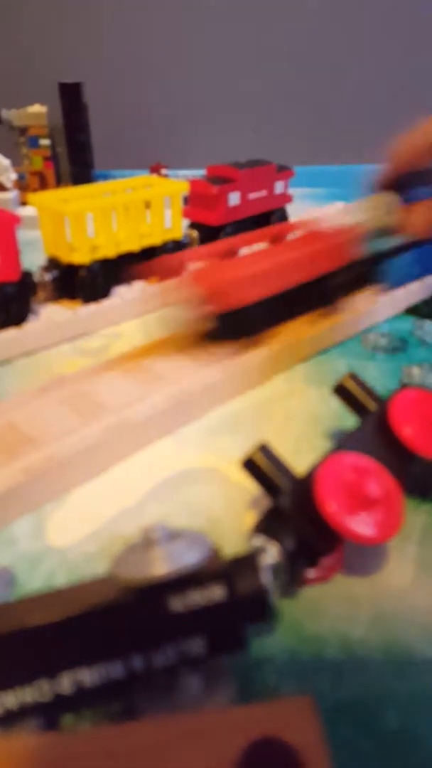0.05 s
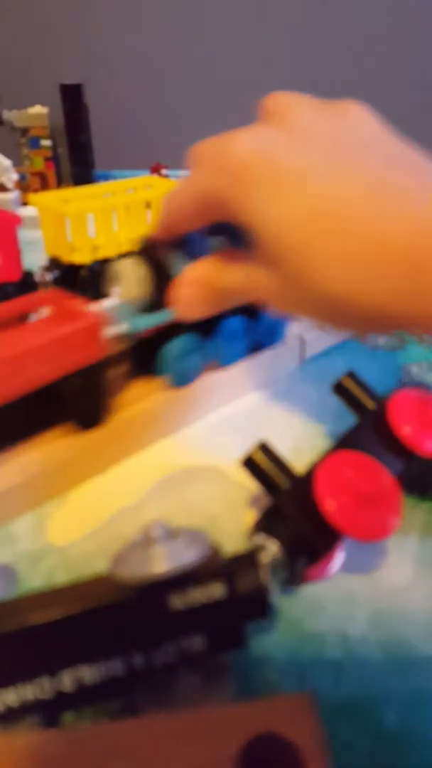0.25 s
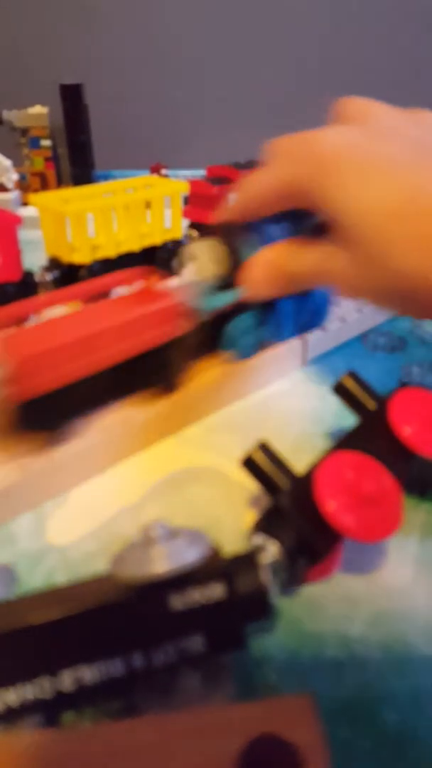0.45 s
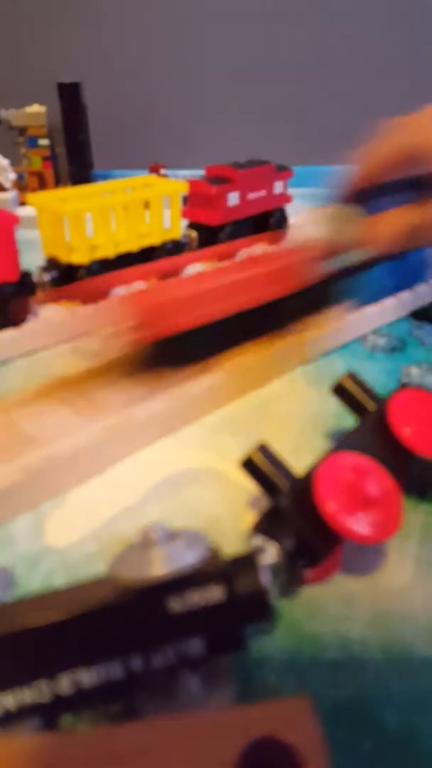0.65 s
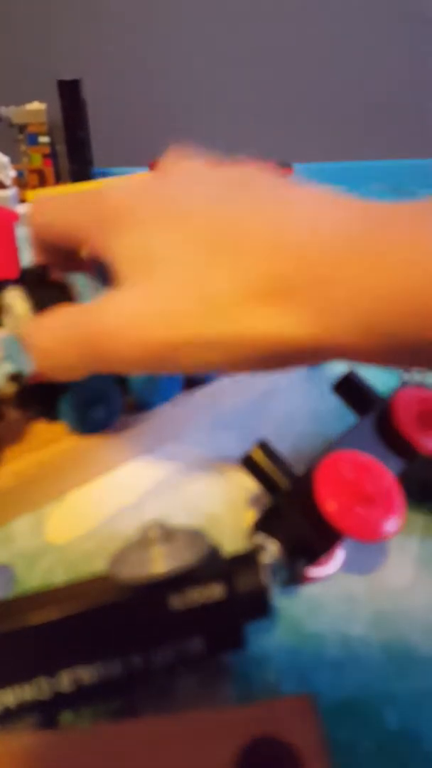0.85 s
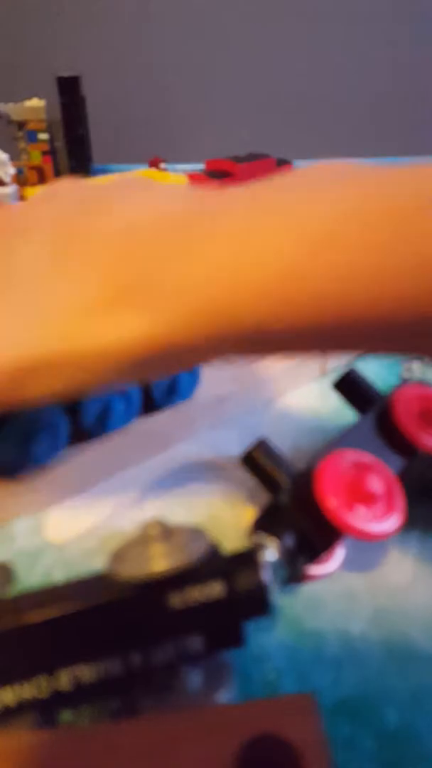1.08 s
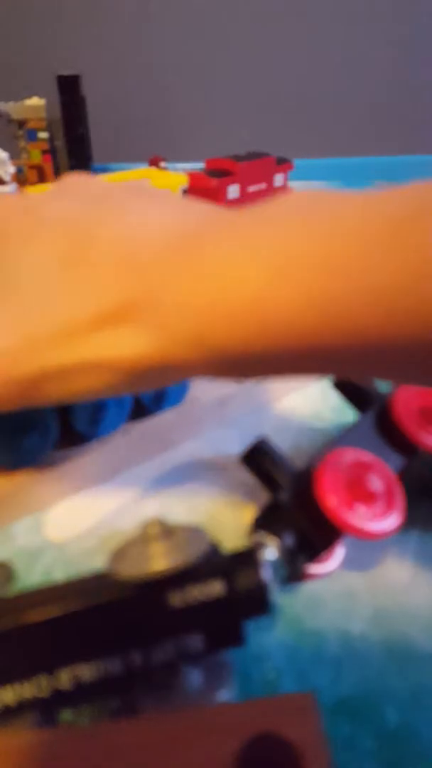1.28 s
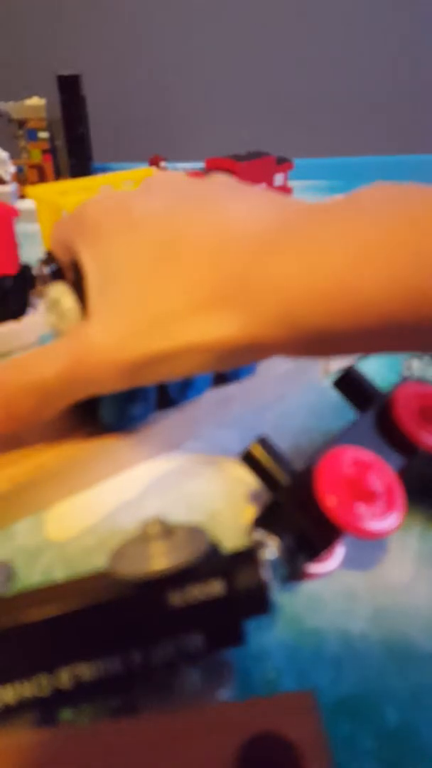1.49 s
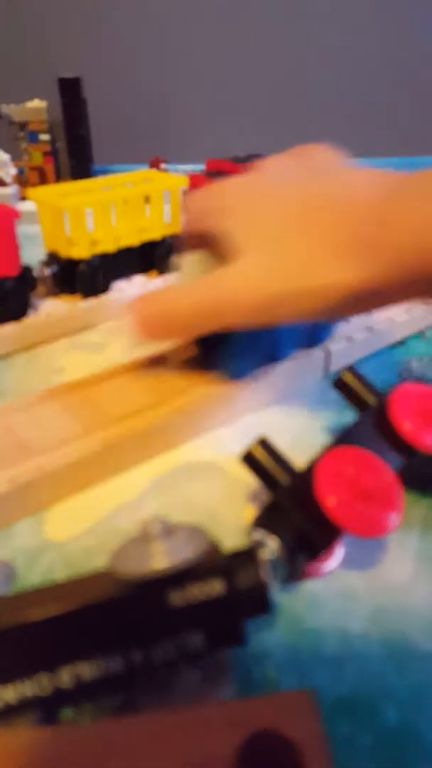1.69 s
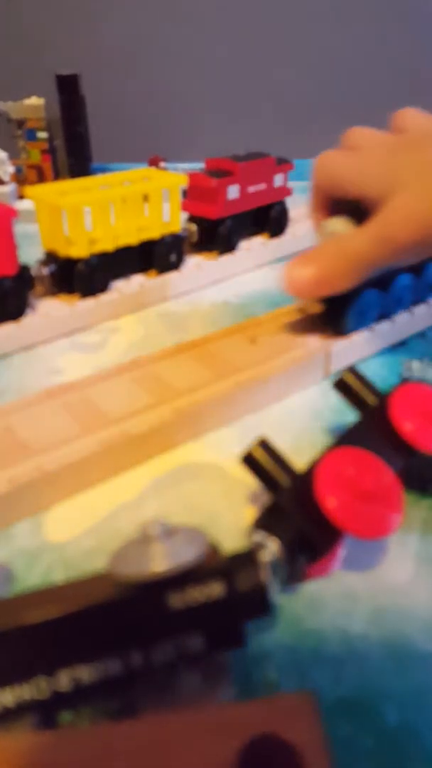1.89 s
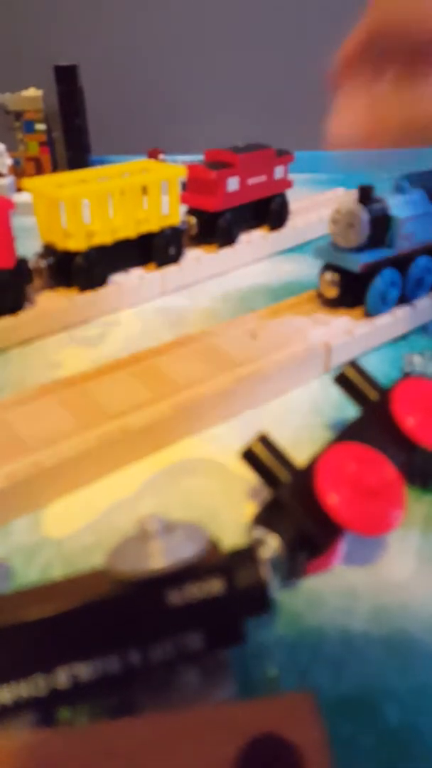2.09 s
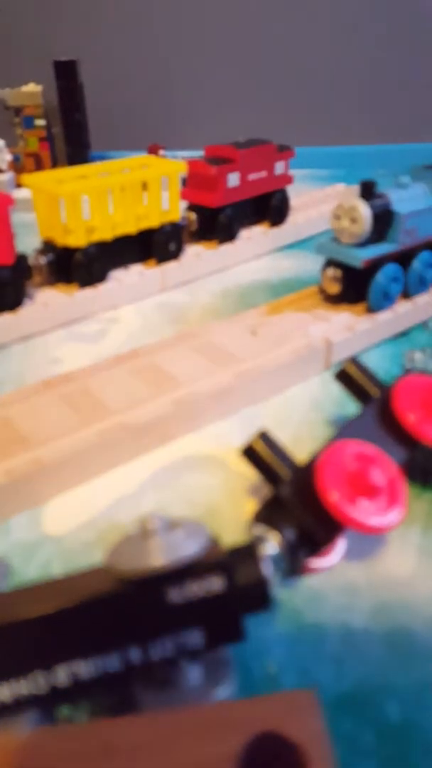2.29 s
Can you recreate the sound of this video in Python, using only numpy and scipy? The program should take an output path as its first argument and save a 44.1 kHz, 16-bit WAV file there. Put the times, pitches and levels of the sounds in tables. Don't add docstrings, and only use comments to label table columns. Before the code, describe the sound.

Wooden toy train pushed back and forth on hollow wooden track, rumbling, rattling and clacking close up

```python
import sys
import numpy as np
from scipy import signal
from scipy.fft import rfft, irfft, next_fast_len
from scipy.io import wavfile
from scipy.ndimage import uniform_filter1d

SR = 44100
rng = np.random.default_rng(int(sys.argv[2]) if len(sys.argv) > 2 else 0)


def file_out(sig):
    cols = np.atleast_2d(sig).T
    lim = np.clip(cols, -1, 1)
    pcm = np.round(lim * 32767).astype(np.int16)
    wavfile.write(sys.argv[1], SR, pcm)


def how_loud(loudness_db):
    steps = np.asarray(loudness_db, float) / 20
    return 10 ** steps


N = 103194


def evened(x):
    return x / np.sqrt(np.mean(x ** 2) + 1e-20)


def read(points, hz):
    f, value = np.transpose(points)
    return np.interp(np.log(hz + 1), np.log(f + 1), value)


def along(rows, axis=1):
    rows = np.asarray(rows)
    return np.interp(np.arange(N) / SR, rows[:, 0], rows[:, axis])


def colour(x, points):
    gain = np.log(how_loud(read(points, abs(np.fft.fftfreq(4096, 1 / SR)))))
    response = np.fft.ifft(np.exp(np.conj(signal.hilbert(gain)))).real[:2048]
    return signal.oaconvolve(x, response / np.linalg.norm(response))[:N]


def body(x, modes, damping=1):
    t = np.arange(4096) / SR
    response = np.zeros(4096)
    for hz, width_hz, db in modes:
        decay = np.exp(-np.pi * width_hz * damping * t)
        response += how_loud(db) * np.sqrt(width_hz) * decay * np.sin(2 * np.pi * hz * t)
    return signal.oaconvolve(x, response / np.linalg.norm(response))[:N]


def resonate(x, hz, width_hz):
    turn = np.exp(2j * np.pi * np.cumsum(hz) / SR)
    r = np.exp(-np.pi * width_hz / SR)
    return (turn * signal.lfilter([1], np.convolve([1, -r], [1, -r]), x / turn)).real


def grains(per_s, spread_db, smooth):
    draw = rng.random((N, 2))
    size = how_loud(spread_db * np.minimum(-np.log(draw[:, 1] + 1e-9), 3))
    bumps = size * (draw[:, 0] < per_s / SR) * rng.choice([-1., 1.], N)
    return evened(evened(bumps) + smooth * rng.standard_normal(N))


def steadied(x):
    n = int(0.052 * SR)
    power = uniform_filter1d(uniform_filter1d(x ** 2, n), n)
    return evened(x / (abs(power) + 1e-3) ** (0.94 / 2))


def knocks(rows, decay_s, db):
    out, t = np.zeros(N + 1500), np.arange(1500) / SR
    envelope = np.minimum(t / 0.00035, 1) * np.exp(-t / decay_s)
    for s, level_db, hz in rows:
        at = round(s * SR)
        out[at:at + 1500] += how_loud(level_db + db) * envelope * np.sin(2 * np.pi * hz * t)
    return out[:N]


def pair(x, lag_s, left_db, scatter_db=-60):
    size, t = next_fast_len(N + 64), np.arange(300) / SR
    delay = np.exp(-2j * np.pi * np.fft.rfftfreq(size, 1 / SR) * lag_s)
    late = irfft(rfft(x, size) * delay, size)[:N]
    echo = rng.standard_normal((2, 300))
    echo = (echo - uniform_filter1d(echo, size=41)) * np.exp(-t / 0.0025)
    echo = how_loud(scatter_db) * echo / np.linalg.norm(echo, axis=1, keepdims=True)
    echo = echo + (t == 0)
    both = np.array([x * how_loud(left_db / 2), late * how_loud(-left_db / 2)])
    return signal.oaconvolve(both, echo, axes=1)[:, :N]


def spread(x):
    hz, t, z = signal.stft(x, SR, nperseg=64)
    phase = np.exp(2j * np.pi * rng.random((2, *z.shape)))
    return signal.istft(z * phase, SR, nperseg=64)[1][:, :N]


# frequency in Hz, density in dB per Hz.
HUSH = [(18, -28), (30, -3.5), (110, 2), (844, -10.5), (1500, -18.5), (16000, -39.5)]


def hush():
    noise = rng.standard_normal((3, N))
    return how_loud(-68) * np.array([colour(noise[0] + 2.9 * own, HUSH) for own in noise[1:]])


# time in seconds, hand pressure in dB, wheel looseness in dB.
PUSHES = [
    [(0, -18.5, -4.5), (.078, -33, -6.5), (.14, -17, -7.5), (.225, -18.5, -6), (.262, -32, -8),
     (.385, -37.5, -10), (.455, -66, -11.5)],
    [(.484, -51, -22.5), (.526, -23.5, -9.5), (.625, -27.5, -7.5), (.67, -43, -10)],
    [(.7, -24.5, -10.5), (.748, -26, -4), (.782, -18.5, -6), (.83, -33.5, -5), (.89, -33.5, -14),
     (.945, -62, -3), (1.0, -51, -4.5), (1.045, -56, -19)],
    [(1.09, -38, -51), (1.144, -46, -3.5), (1.165, -35.5, -10), (1.185, -44.5, -8), (1.25, -39, -6.5),
     (1.345, -70.5, -3.5)],
    [(1.375, -66, -18), (1.398, -20, -15.5), (1.424, -43.5, 0.5), (1.446, -25.5, -8.5), (1.49, -33, -9),
     (1.585, -49, -12.5)],
    [(1.625, -30, -24), (1.7, -20.5, -14.5), (1.82, -21, -14.5), (1.875, -33.5, -6), (1.995, -43.5, -1.5)],
    [(2.035, -21.5, -14.5), (2.1, -48.5, -4.5), (2.15, -43.5, -20), (2.25, -75.5, -6.5)],
]


def pushes():
    rows = np.concatenate(PUSHES)
    return along(rows, axis=1), along(rows, axis=2) + 10


# frequency in Hz, width in Hz, level in dB.
TABLE = [(107, 45, -3), (157, 75, -19), (203.6, 3.7, -9), (273.5, 10, -0.5), (342.7, 36, -1),
         (407.4, 37, 4)]
# time in seconds, frequency in Hz, dB over the drumming.
HOLLOW = [(0, 358.5, -7.5), (1.58, 367, -10.5), (1.66, 257.6, -13.5), (1.83, 244, -11.5), (1.88, 147.5, 7),
          (1.93, 183.7, 5.5), (1.98, 168.6, 7.5), (2.03, 138, -12), (2.12, 178, 2), (2.21, 250, 0.5)]


def drum(bumps, press):
    span = steadied(resonate(bumps, along(HOLLOW, axis=1), 63))
    span = how_loud(along(HOLLOW, axis=2)) * span
    return how_loud(press - 1.5) * (steadied(body(bumps, TABLE)) + span)


# frequency in Hz, width in Hz, level in dB.
RAILS = [(601, 52, 2), (743, 136, 2.5), (850, 150, -2), (980, 95, 3), (1235, 200, -4)]


def rattle(bumps, press, loose):
    shaken = body(bumps + grains(200, 1.3, 0.71), RAILS)
    return how_loud(press + 0.44 * loose - 5.0) * steadied(shaken)


# frequency in Hz, width in Hz, level in dB.
WHEELS = [(1650, 270, -6.5), (1848, 210, 4.5), (2290, 320, 9), (2600, 470, 13), (2890, 170, 9),
          (3060, 190, 5.5), (3330, 200, -1.5), (5080, 290, 0)]


def chatter(press, loose):
    parts = sum(how_loud(mode[2]) * body(grains(320, 4.3, 0.35), [mode]) for mode in WHEELS)
    band = signal.butter(2, [1500, 6500], "band", fs=SR, output="sos")
    return how_loud(press + loose - 13.5) * steadied(signal.sosfilt(band, parts))


# frequency in Hz, level in dB.
GRIT = [(1000, -42), (1800, -12), (3600, -7.5), (4200, -13.5), (8000, -26), (11000, -26), (15000, -34.5)]


def scrape(rubs, press, loose):
    return how_loud(press + 2.34 * loose - 20.0) * steadied(colour(rubs, GRIT))


# frequency in Hz, decay by 60 dB in seconds.
ROOM = [(150, 0.14), (2500, 0.21), (14000, 0.0089)]


def room(x):
    echoes = np.zeros((2, SR // 2))
    spots = np.arange(60, SR // 2 - 20, 20)
    shape = (2, len(spots))
    np.put_along_axis(echoes, spots + rng.integers(0, 20, shape), rng.choice([-1., 1.], shape), 1)
    hz, t, z = signal.stft(echoes, SR, nperseg=256)
    fade = how_loud(-60 * t / read(ROOM, hz)[:, None])
    tail = signal.istft(z * fade, SR, nperseg=256)[1]
    return signal.fftconvolve(x[None], tail / np.linalg.norm(tail[0]), axes=1)[:, :N]


# start in seconds, peak in dB, ring in Hz, snap in dB.
CLACKS = [(.0024, -13, 2750, -37.5), (.0315, -13, 1990, -35), (.095, -14, 3060, -41),
          (.138, -9.5, 3420, -15), (.1695, 3.5, 3250, -39), (.1932, -4.5, 3510, -34),
          (.2185, -10, 2290, -18.5), (.291, -27, 2370, -10), (.3465, -21, 1750, -19),
          (.5282, -11.5, 2290, -39), (.587, -15, 2580, -17.5), (.712, -15.5, 3040, -20),
          (.741, -3.5, 2450, -17), (.9585, -42, 2280, -17), (1.1135, -43.5, 2220, -13),
          (1.148, -24, 1730, -10.5), (1.1962, -24.5, 2630, -21), (1.2215, -29, 2600, -19),
          (1.231, -26, 2740, -13.5), (1.241, -26, 2890, -14.5), (1.4045, -26, 4030, 1),
          (1.606, -34, 3270, -21.5), (1.682, -15.5, 3220, -45), (1.779, -15.5, 1920, -33),
          (1.79, -9.5, 3070, -18.5), (1.8477, -14.5, 2460, -32.5), (2.049, -15.5, 2440, -40)]
# frequency in Hz, level in dB.
SNAP = [(1500, -3), (4000, 0.5), (7000, -11), (11000, -9), (15500, -9.5)]


def clacks():
    hits, snaps, rings = np.zeros((3, N))
    t = np.arange(600) / SR
    shake = rng.standard_normal((len(CLACKS), 600)) * t * np.exp(-t / 0.0009)
    shake = shake / np.linalg.norm(shake, axis=1, keepdims=True)
    envelope = np.minimum(t / 0.0017, 1) * np.exp(-t / 0.0014)
    for contact, (s, db, hz, snap_db) in zip(shake, CLACKS):
        at = round(s * SR)
        hits[at:at + 600] += how_loud(db) * contact
        snaps[at:at + 600] += how_loud(db + snap_db) * contact
        rings[at:at + 600] += how_loud(db + 3.0) * envelope * np.sin(2 * np.pi * hz * t)
    thud = how_loud(9) * body(hits, RAILS, damping=2.5)
    clack = how_loud(5.5) * body(hits, WHEELS, damping=0.67) + rings
    return thud, clack, how_loud(21.0) * colour(snaps, SNAP)


# start in seconds, level in dB, pitch in Hz.
JOLTS = [(0.102, -15, 715), (0.114, -10, 452), (0.127, -19, 704), (0.139, -4, 766), (0.152, -17.5, 452),
         (0.167, -17.5, 505), (0.169, -14, 816), (0.194, -10, 890), (0.207, -9.5, 700), (0.216, -16, 495),
         (0.507, -28, 452), (0.528, -13.5, 452), (0.559, -12.5, 936), (0.589, -13, 577), (0.698, -22, 573),
         (0.741, -29, 644), (0.765, -10.5, 729), (0.777, -8.5, 969), (0.786, -8.5, 750),
         (0.809, -14.5, 715), (1.16, -26, 460), (1.196, -21.5, 835), (1.223, -23, 960), (1.229, -30.5, 760),
         (1.245, -57, 597), (1.394, -22, 519), (1.44, -14.5, 628), (1.615, -26, 452), (1.627, -19, 462),
         (1.644, -20.5, 654), (1.656, -24.5, 616), (1.71, -21.5, 452), (1.733, -20.5, 730),
         (1.754, -14.5, 680), (1.777, -12, 886), (1.786, -9.5, 570), (1.819, -13, 670), (1.85, -17, 720),
         (2.017, -22.5, 800), (2.038, -28, 465)]


def jolts():
    return knocks(JOLTS, 0.0027, db=0.5)


# start in seconds, level in dB, pitch in Hz.
TICKS = [(0.1141, -17, 3360), (0.1703, -11, 3250), (0.1812, -14, 3410), (0.208, -24, 3370),
         (0.5453, -15, 3290), (0.5936, -16.5, 2920), (0.728, -19, 3150), (0.7403, -12.5, 3673),
         (0.7564, -30, 2930), (0.7714, -20.5, 3660), (0.7894, -17, 3360), (0.8094, -26, 2920),
         (0.835, -22, 3130), (1.1564, -32, 3180), (1.162, -35, 3150), (1.2284, -39, 2730),
         (1.254, -46, 2760), (1.391, -38, 3300), (1.4113, -41, 3040), (1.4496, -39, 3400),
         (1.4596, -38, 3070), (1.618, -38, 3000), (1.6765, -21, 3160), (1.6942, -21, 3000),
         (1.711, -42, 3360), (1.713, -18, 3210), (1.7362, -20, 3250), (1.759, -34, 3270),
         (1.7764, -25, 3200), (1.7874, -24, 3130), (1.8357, -27, 3470)]


def axle_ticks():
    return knocks(TICKS, 0.0025, db=-0.85)


# start in seconds, level in dB, pitch in Hz.
TAPS = [
    (1.7, -33, 420),
    (1.449, -11.5, 580),
    (1.591, -26, 490),
    (2.153, -33, 750),
    (2.153, -31.5, 1250),
    (2.153, -37, 1900),
    (1.7, -27, 440),
    (2.172, -53, 4360),
    (2.166, -51, 4330),
    (2.31, -46, 599),
]


def small_taps():
    return knocks(TAPS, 0.002, db=-0.5)


def whirr(press):
    t = np.arange(N) / SR
    on = np.clip(np.minimum(t - 1.6, 1.8 - t) / 0.017, 0, 1)
    return on * how_loud(press - 28) * steadied(resonate(grains(140, 5.0, 0.2), np.full(N, 3250), 220))


# time in seconds, level in dB.
SLIDE = [(1.79, -43), (1.85, -55.5), (1.875, -43.5), (1.99, -45.5), (2.03, -58), (2.13, -78)]
# frequency in Hz, density in dB per Hz.
SKIN = [(710, -57), (1400, -50), (1900, -2), (2860, -0.5), (5840, -7), (7820, -23), (10700, -6),
        (14500, -25), (16000, -57)]


def slide():
    t = np.arange(N) / SR
    fade_in = np.clip((t - SLIDE[0][0]) / 0.015, 0, 1)
    fade_out = np.clip((SLIDE[-1][0] + 0.1 - t) / 0.06, 0, 1)
    return fade_in * fade_out * how_loud(along(SLIDE) + 5.5) * colour(grains(4000, 7.2, 2.8), SKIN)


def ring():
    t = np.maximum(np.arange(N) / SR - 2.085, 0)
    return how_loud(-48.5 - 60 * t / 0.69) * np.minimum(t / 0.0042, 1) * np.sin(2 * np.pi * 947 * t)


def scene():
    press, loose = pushes()
    bumps, rubs = grains(540, 7.0, 0.79), grains(900, 3.7, 0.65)
    low = drum(bumps, press)
    knock = rattle(bumps, press, loose) + jolts() + small_taps() + ring()
    mid = chatter(press, loose) + whirr(press) + axle_ticks()
    thud, clack, snap = clacks()
    knock, mid = knock + thud, mid + clack
    high = scrape(rubs, press, loose) + snap + slide()

    near = pair(low, 0.00021, -0.7) + pair(knock, 0.00021, -1.1, scatter_db=-4.5)
    near = near + pair(mid, 0.00018, -8.0, scatter_db=0)
    near = near + pair(high, 0.000571, 1.5, scatter_db=-4.5)
    far = how_loud(-14.5) * room(low + knock) + how_loud(-8.0) * room(mid) + how_loud(-14) * room(high)
    return near + far + how_loud(1.5) * spread(high)


# frequency in Hz, gain in dB.
MIC = [(30, -35.5), (60, -24), (95, -6), (140, 1), (12500, 0), (14500, -6.5), (16300, -41.5)]


def microphone(x):
    size = next_fast_len(N + 4096)
    gain = how_loud(read(MIC, np.fft.rfftfreq(size, 1 / SR)))
    return irfft(rfft(x, size) * gain, size)[:, :N]


def roll_off(x):
    return signal.sosfilt(signal.butter(12, 16480, fs=SR, output="sos"), x)


def record(dry):
    mix = microphone(dry) + hush()
    return roll_off(np.clip(mix, -1, 1))


dry = scene()
out = record(dry)
file_out(out)
```